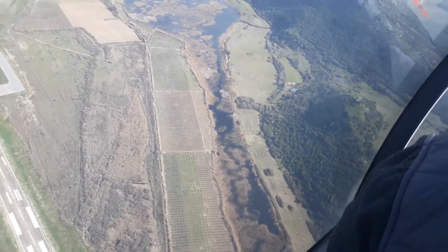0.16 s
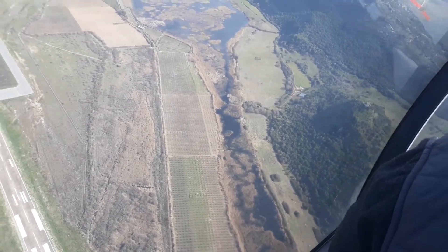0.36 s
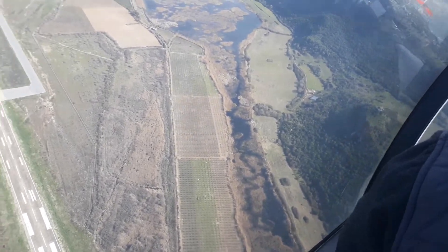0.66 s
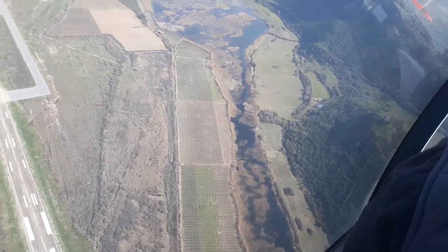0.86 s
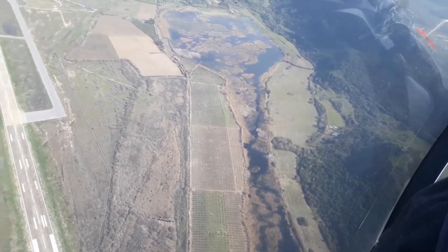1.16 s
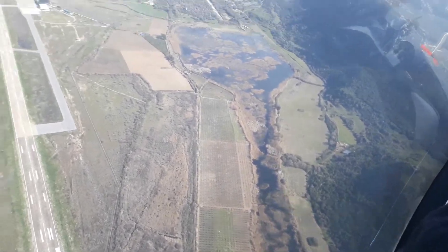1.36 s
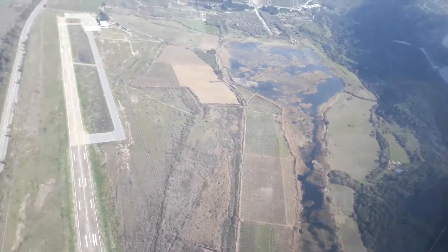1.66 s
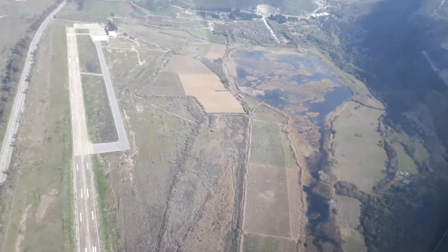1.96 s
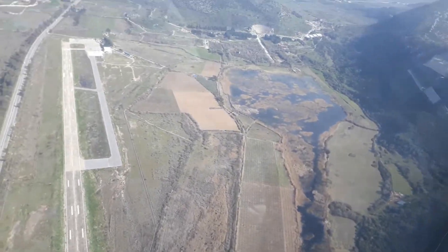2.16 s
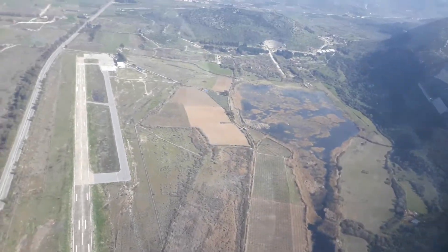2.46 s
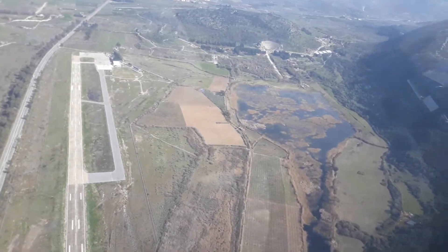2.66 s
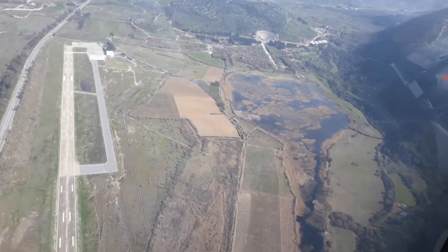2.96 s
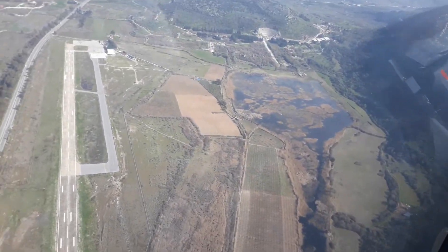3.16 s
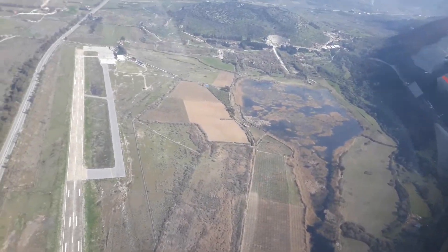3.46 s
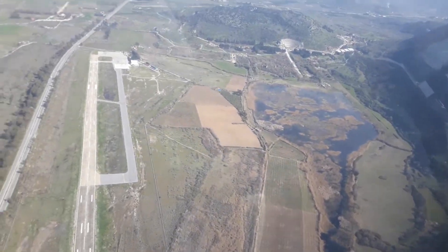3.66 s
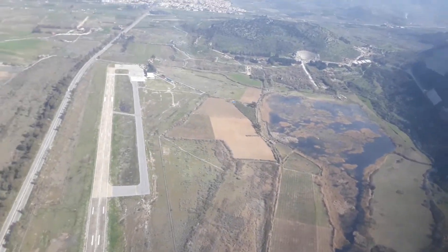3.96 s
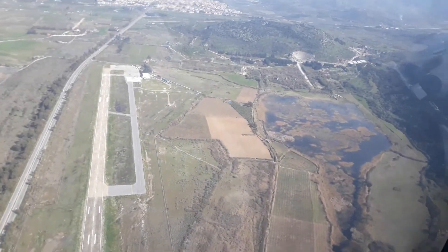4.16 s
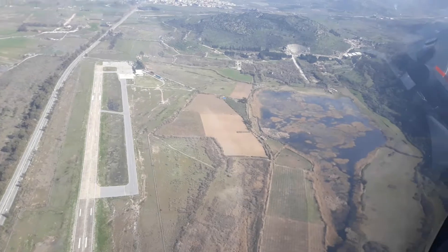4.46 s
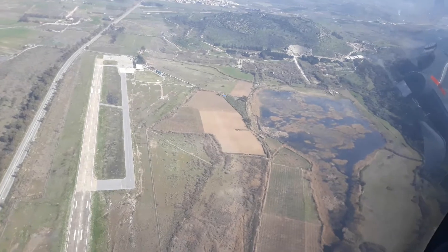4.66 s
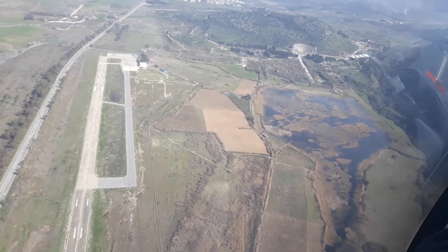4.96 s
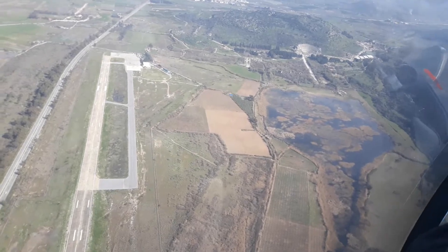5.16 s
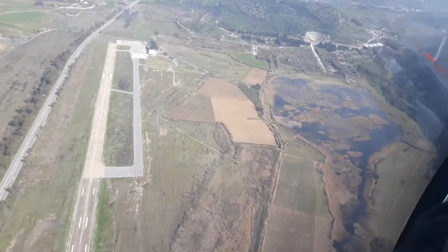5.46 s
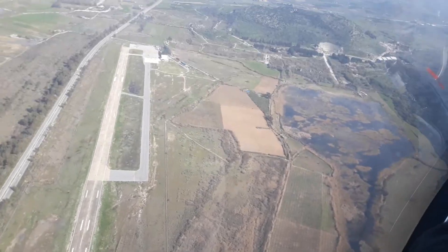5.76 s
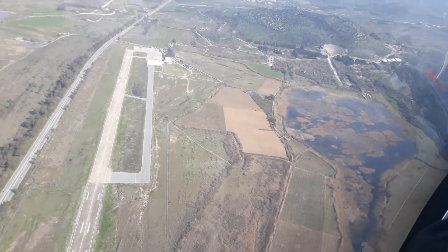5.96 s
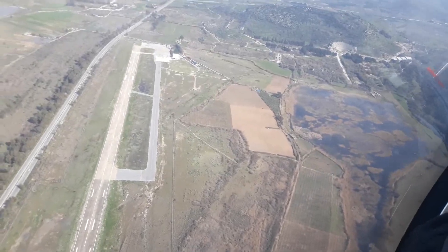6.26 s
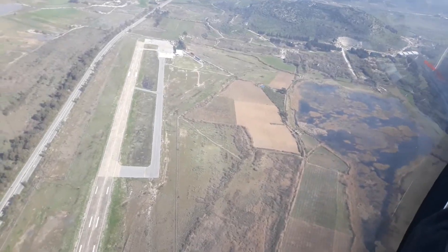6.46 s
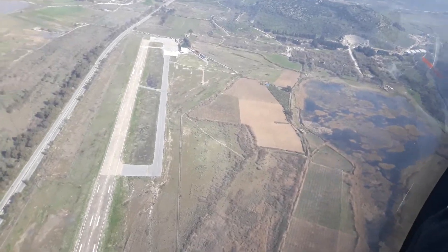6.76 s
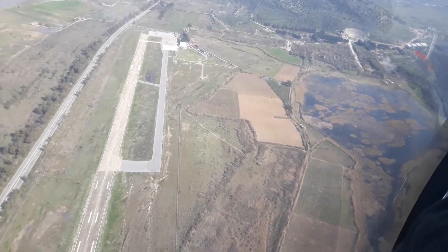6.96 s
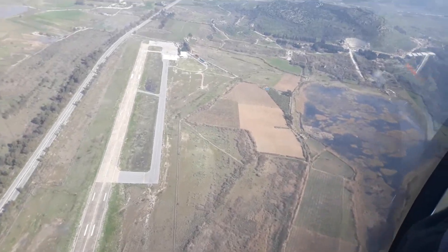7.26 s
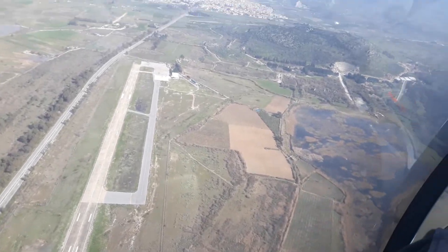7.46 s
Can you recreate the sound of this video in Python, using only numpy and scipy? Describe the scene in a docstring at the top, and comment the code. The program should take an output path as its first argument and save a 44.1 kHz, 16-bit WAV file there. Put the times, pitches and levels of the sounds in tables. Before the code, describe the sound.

Inside a light rotor aircraft, steady propeller and engine hum fills the cockpit, with fluttering air, wavering whistles, a hard tap midway and small chinks.

```python
"""In the cockpit of a small rotor aircraft in flight, heard by the microphone of a hand-held camera. Throughout, the
propeller and engine hum as shaft-locked tones over cabin rumble and slipstream hiss, shaped noise that throbs with the
overhead rotor; air whistles at three gaps as narrow noise bands. From about 1 to 2 s the camera turns and the treble dulls;
from 1.5 s something loose chinks now and then, as rings in short buzzes. Near 3.5 s a finger knocks on the case, as thuds
with noise snaps; the aircraft's level then dips and creeps back, with one more light knock at 5.5 s."""
import sys
import numpy as np
from scipy import signal
from scipy.fft import rfft, irfft, next_fast_len
from scipy.io import wavfile
from scipy.ndimage import uniform_filter1d, minimum_filter1d

SR = 44100
rng = np.random.default_rng(int(sys.argv[2]) if len(sys.argv) > 2 else 0)


def generate_wav(sig):
    """Save sig (samples, or channels by samples) to the path in sys.argv[1] as 16-bit PCM at SR."""
    pcm = np.round(np.clip(np.atleast_2d(sig).T, -1, 1) * 32767).astype(np.int16)
    wavfile.write(sys.argv[1], SR, pcm)


N = 335151  # samples, 7.6 s

# How each region of the air noise answers the turn and the dip: (centre [Hz], change over the turn [dB],
# turn start [s], turn end [s], level added where the aircraft's level is at DIP_DB [dB])
REGIONS = [(160, -0.5, 1.3, 2.0, 1.5), (600, 1.5, 1.0, 1.6, .5), (1100, -0.5, 1.1, 1.1, 0),
           (1600, -1.5, 1.3, 1.1, 1.5), (2820, 5.5, 1.6, 2.0, 1), (4300, -7.5, 1.4, 1.65, -0.5),
           (6800, -9.5, 1.4, 1.95, -2.5), (11500, -6, 1.65, 2.0, 0.5), (14500, -10, 1.6, 1.95, -0.5)]
DIP_DB = -8


def undb(db):
    """Gain of a level in dB."""
    return 10 ** (np.asarray(db) / 20)


def curves(table):
    """Columns of a table after its time column, interpolated to one value a sample."""
    times, *columns = np.transpose(table)
    return [np.interp(np.arange(N) / SR, times, column) for column in columns]


def walk(rate):
    """Random levels held 1 / rate s and smoothed twice; spread near 1."""
    hold = int(SR / rate)
    steps = np.repeat(rng.standard_normal(N // hold + 1), hold)
    smooth = uniform_filter1d(uniform_filter1d(steps, hold), hold)
    return 1.66 * smooth[:N]


def flutter(rate):
    """Quick random wavering with its slow drift taken out."""
    wander = walk(rate)
    return wander - uniform_filter1d(wander, int(4 * SR / rate))


def unit(x):
    """Scaled to rms 1."""
    return x / np.sqrt(np.mean(x ** 2))


def add(out, time, sound):
    """Mixes a short sound in at a time in s."""
    start = int(time * SR)
    out[start:start + len(sound)] += sound[:len(out) - start]


def ramp(start_s, end_s):
    """Rises from 0 to 1 between two times, over at least 50 ms from the first."""
    return np.clip((np.arange(N) / SR - start_s) / max(end_s - start_s, .05), 0, 1)


def region_db(change_db, start_s, end_s, dip_extra_db):
    """Level of one part of the aircraft's sound: the common level, its own share of the dip, and the turn."""
    # The aircraft's level, which sinks after the knocks and creeps back: (time [s], level [dB])
    level = [(0, -2), (.7, -0.5), (2.0, 0.5), (3.45, -0.5), (3.7, -5), (4.1, -8), (4.35, -6), (4.55, -8.5),
             (4.75, -6.5), (5.0, -3.5), (5.5, -1.5), (6.2, -1.5), (7.6, 0)]
    level_db, = curves(level)
    return level_db * (1 + dip_extra_db / DIP_DB) + change_db * ramp(start_s, end_s)


def throb():
    """Rotor downwash: one swell a blade, one of the two blades stronger, the turning slightly unsteady."""
    rotor_hz = 6.56
    turn = 2 * np.pi * (rotor_hz * np.arange(N) / SR + .08 * walk(1))
    return np.sin(2 * turn) + 0.36 * np.sin(turn)


def air():
    """Cabin rumble and slipstream hiss: overlapping bands of turbulence that gust together, the treble fluttering most."""
    # Spectra of the rumble and of the hiss above it: (frequency [Hz], relative level [dB])
    rumble = [(22, -49), (43, -24.5), (75, -8.5), (99, -1), (130, -6.5), (155, -3), (205, -7), (247, -8.5),
              (290, -13), (600, -17.5), (750, -22)]
    hiss = [(1300, -26.5), (1600, -24), (3300, -24), (3700, -29), (5000, -39.5), (8400, -67),
            (10000, -67.5), (11600, -61.5), (15700, -67.5)]
    air_db = -14  # rms of the whole
    region_centres = np.log2([row[0] for row in REGIONS])
    levels = [region_db(*row[1:]) for row in REGIONS]

    size = next_fast_len(N)
    octave = np.log2(np.maximum(np.arange(size // 2 + 1) * SR / size, 1.))  # octaves above 1 Hz
    hz, colour_db = np.transpose(rumble + hiss)
    colour = np.interp(octave, np.log2(hz), colour_db)
    spectrum = rfft(rng.standard_normal(size)) * undb(colour)

    gust = flutter(40)
    flap = flutter(28) + flutter(77)
    beat = throb()
    out = 0
    for centre in np.arange(3.5, 14.5, .5):
        # raised-cosine bands half an octave apart, which sum to a flat response
        window = np.cos(np.pi * np.clip(octave - centre, -.5, .5)) ** 2
        band = irfft(spectrum * window, size)[:N]
        # each band takes its level from the regions on either side
        db = sum(np.interp(centre, region_centres, pick) * (level - level.mean())
                 for pick, level in zip(np.eye(len(REGIONS)), levels))
        middle = np.clip(centre - 8, 0, 1)  # fades in over the octave above 256 Hz
        treble = np.clip(centre - 12.2, 0, 1)  # fades in over the octave above 4.7 kHz
        db = db + middle * (.7 * gust + .55 * beat + .9 * flutter(45))
        db = db + treble * (.45 * flap + 1.6 * flutter(110) + .3 * beat)
        out = out + undb(db) * band
    return unit(out) * undb(air_db)


def whistle(table, width_hz):
    """Air over a gap: a narrow, wavering band of noise around a wandering pitch."""
    hiss_db = -27  # slipstream hiss before the turn, which the whistle rides on
    hz, db = curves(table)
    low = signal.butter(2, width_hz / 2, fs=SR, output="sos")
    in_phase, quadrature = signal.sosfilt(low, rng.standard_normal((2, N)))
    turn = 2 * np.pi * np.cumsum(hz * (1 + .005 * walk(6))) / SR
    tone = in_phase * np.cos(turn) + quadrature * np.sin(turn)
    # follows the 1600 Hz region through turn and dip
    return unit(tone) * undb(db + hiss_db + region_db(*REGIONS[3][1:]) + 1.5 * walk(10))


def whistles():
    """Three gaps, each with its own pitch path and breadth."""
    # Paths of the three whistles: (time [s], pitch [Hz], level above the hiss [dB])
    low_path = [(0, 2250, -10), (.7, 2190, -4), (.9, 2207, -7), (1.3, 2175, 1.5), (1.5, 2274, -5),
                (2.3, 2245, -2.5), (3.4, 2263, -1), (4.2, 2303, -6.5), (5, 2263, -27), (7.6, 2190, -24)]
    middle_path = [(0, 2516, -27), (1.9, 2397, -14.5), (3, 2497, -7), (3.5, 2492, -5), (4.3, 2780, -2.5),
                   (4.9, 2850, -14), (6, 2945, -4), (7.3, 2925, -6.5), (7.6, 2840, -10)]
    high_path = [(0, 3380, -8), (1.4, 3400, -9), (1.8, 3480, -9), (3.4, 3490, -20.5), (4.4, 3400, -18.5),
                 (5.3, 3400, -3.5), (6.5, 3370, -4), (7.6, 3350, -3)]
    return whistle(low_path, width_hz=64) + whistle(middle_path, width_hz=150) + whistle(high_path, width_hz=123)


def rattles():
    """Something loose chinks: a short decaying ring inside a few milliseconds of noise buzz."""
    # Chinks: (time [s], level [dB], ring pitch [Hz], breadth: level added to body and top of the buzz [dB])
    chinks = [(1.4936, -13, 3350, -1), (4.3024, -21, 3300, 0), (4.3274, -14, 2800, 4),
              (4.3924, -20, 2500, 0), (5.5423, -10, 2810, 9), (6.134, -18, 2670, -1),
              (7.1144, -13, 2920, -4), (7.14, -11.5, 3340, 3), (7.2875, -11, 3110, 6),
              (7.432, -15, 3110, 0)]
    out = np.zeros(N)
    t = np.arange(SR // 25) / SR
    body = signal.butter(3, [500, 1270], "band", fs=SR, output="sos")
    edge = signal.butter(3, [1900, 3900], "band", fs=SR, output="sos")
    top = signal.butter(3, [9500, 14500], "band", fs=SR, output="sos")
    for time, db, hz, broad_db in chinks:
        noise = rng.standard_normal(len(t))
        parts = [(body, -7 + broad_db), (edge, -3), (top, -41 + broad_db)]  # band and its level in dB
        buzz = sum(undb(part_db) * unit(signal.sosfilt(band, noise)) for band, part_db in parts)
        ring = np.sin(2 * np.pi * hz * t) * np.exp(-t / 0.0053)
        attack = 1 - np.exp(-t / 0.00064)
        add(out, time, 0.89 * undb(db) * attack * (buzz * np.exp(-t / 0.005) + 1.2 * ring))
    return out


def knocks():
    """A finger on the case: a thud of about one swing that quickens as it rebounds, with a snap and a tick of noise."""
    # Knocks: (time [s], level [dB], thud pitch about 0.4 ms in [Hz], sharpness: level added to the snap [dB],
    # first swing: + push or - pull, and its strength [factor])
    taps = [(3.4728, 14, 790, 4, -1.2), (3.5508, -8.5, 480, 3, -1.1), (3.602, -3, 750, -8, -1.3),
            (3.618, -4, 600, -2, 1), (5.542, -9, 605, 1, -1)]
    tick_per_snap = 1.3  # dB of tick for each dB of sharpness
    out = np.zeros(N)
    t = np.arange(SR // 50) / SR
    edge = signal.butter(5, [1200, 4800], "band", fs=SR, output="sos")
    top = signal.butter(3, [5000, 14000], "band", fs=SR, output="sos")
    for time, db, hz, sharp_db, swing in taps:
        wave = np.sin(2 * np.pi * hz * t * (.8 + 240 * t))
        thud = swing * 4.5 * wave * (t / .00045) * np.exp(-t / .00045)
        burst = rng.standard_normal(len(t)) * (t / .0005) ** 2 * np.exp(-t / .0004)
        snap = undb(-17 + sharp_db) * signal.sosfilt(edge, burst)
        tick = undb(-58 + tick_per_snap * sharp_db) * signal.sosfilt(top, burst)
        add(out, time, undb(db) * (thud + 7.8 * (snap + tick)))
    return out


def hum(turns, orders, levels_db, waver_db, slip):
    """Tones locked to a shaft; gusty air makes each waver in level (dB) and slip in phase (turns)."""
    out = 0
    for order, db in zip(orders, levels_db):
        gain = np.sqrt(2) * undb(db + waver_db * flutter(9))
        out = out + gain * np.sin(2 * np.pi * (order * turns + slip * walk(7.6)))
    return out


def power_plant():
    """Propeller blade tones and, through the gearbox, the crank orders of the four-cylinder engine."""
    # Pace of the propeller: (time [s], blade rate [Hz])
    blade_rate = [(0.0, 49.55), (0.8, 49.44), (1.5, 49.6), (2.2, 50.4), (2.6, 50.12), (3.3, 49.96),
                  (4.1, 49.93), (4.8, 49.17), (5.6, 49.4), (6.0, 48.8), (6.8, 48.52), (7.6, 48.35)]
    # Tones as multiples of blade rate and of crank rate: (order [multiple])
    blade_orders = [1, 2, 3, 4, 5, 7]
    crank_orders = [1, 2, 4, 4.5, 5.5, 6]
    # Level of each of those tones: (level above the hum level [dB])
    blade_db = [-22.5, 1, -20.5, -19.5, -10, -26.5]
    crank_db = [-27.5, -12.5, -10.5, -15.5, -23, -15.5]
    # The hum's answer to turn and dip: (change over the turn [dB], turn start [s], turn end [s],
    # level added where the aircraft's level is at DIP_DB [dB])
    hum_turn = (-2, 1.15, 1, -1.5)
    gear, blade_count, hum_db = 2.43, 3, -11.5  # crank turns per propeller turn, blades, dB
    hz, = curves(blade_rate)
    blades = np.cumsum(hz) / SR  # blade passes so far
    crank = blades / blade_count * gear  # crank turns so far
    propeller = hum(blades, blade_orders, blade_db, waver_db=1.5, slip=.022)
    engine = hum(crank, crank_orders, crank_db, waver_db=2.5, slip=.03)
    return undb(hum_db + region_db(*hum_turn)) * (propeller + engine)


def scene():
    """Everything in the cockpit reaches one microphone."""
    return (air() + whistles() + rattles() + knocks() + power_plant())[None]


def record(dry):
    """A limiter that looks a few milliseconds ahead holds peaks just under full scale; then the top is cut."""
    span, top_hz = int(.005 * SR), 15735  # look-ahead in samples, cutoff in Hz
    need = np.minimum(1, .99 / (np.abs(dry) + 1e-9))
    gain = uniform_filter1d(minimum_filter1d(need, 2 * span + 1), 2 * span + 1)
    top_cut = signal.ellip(16, .2, 80, top_hz, fs=SR, output="sos")
    return signal.sosfilt(top_cut, dry * gain)


dry = scene()
out = record(dry)
generate_wav(out)
```